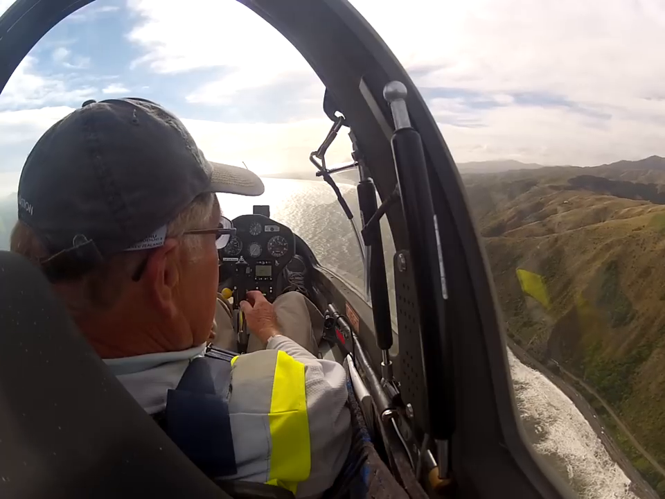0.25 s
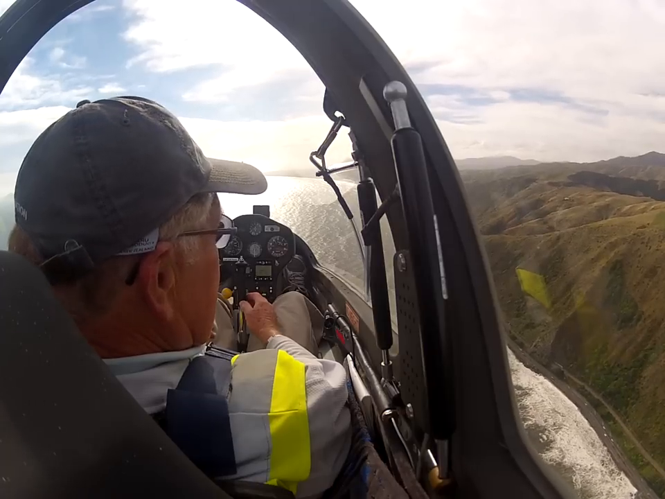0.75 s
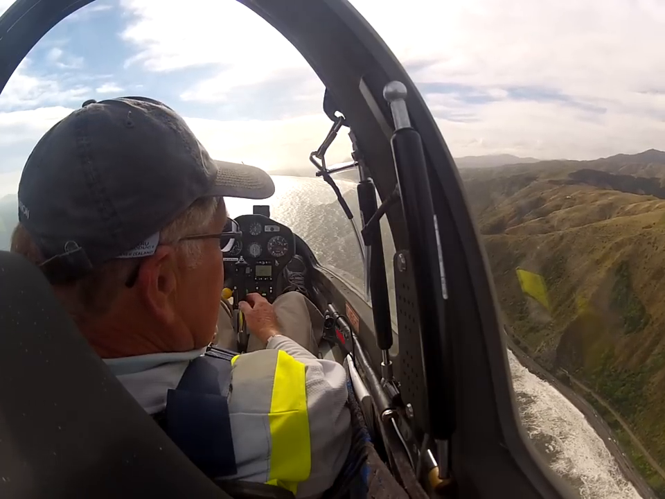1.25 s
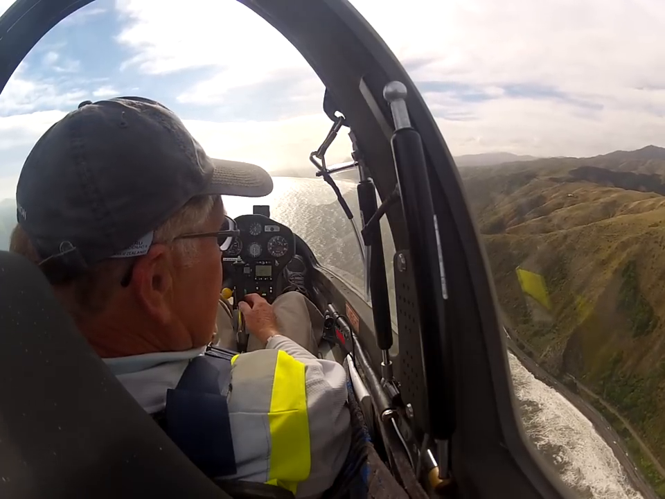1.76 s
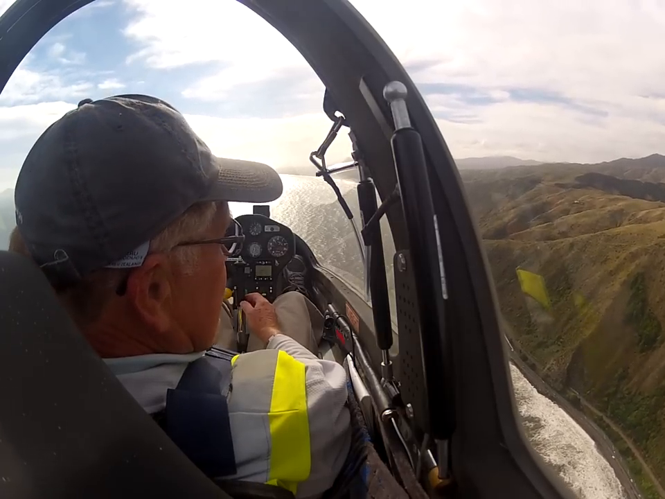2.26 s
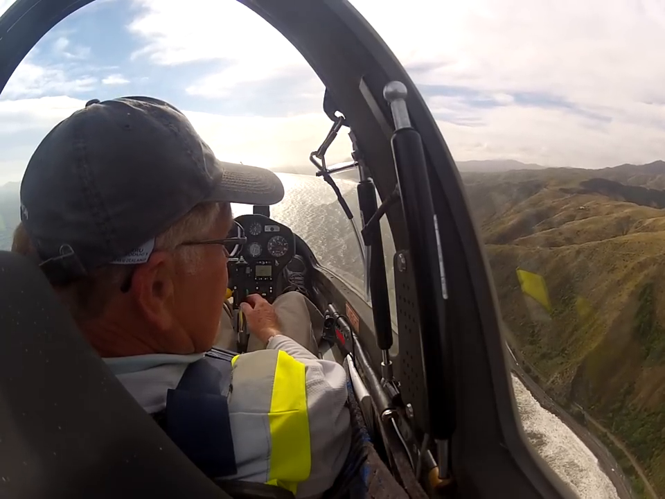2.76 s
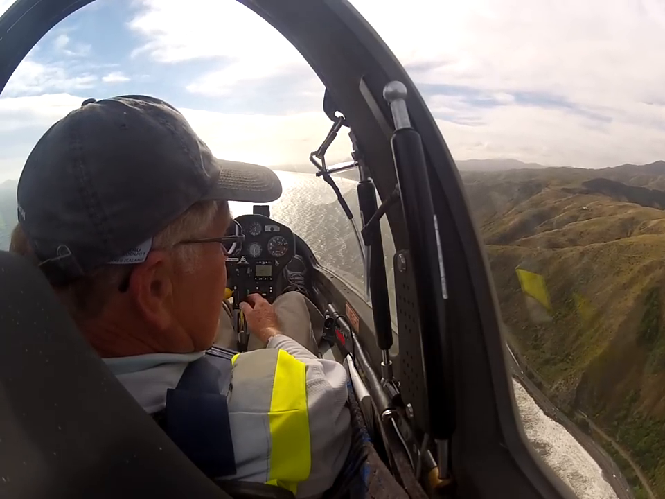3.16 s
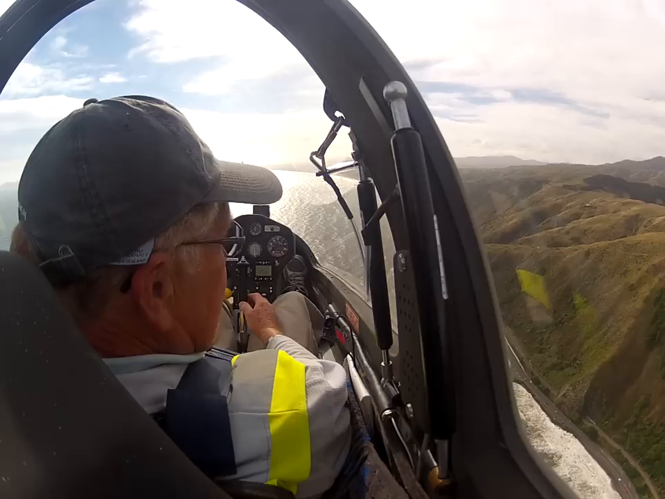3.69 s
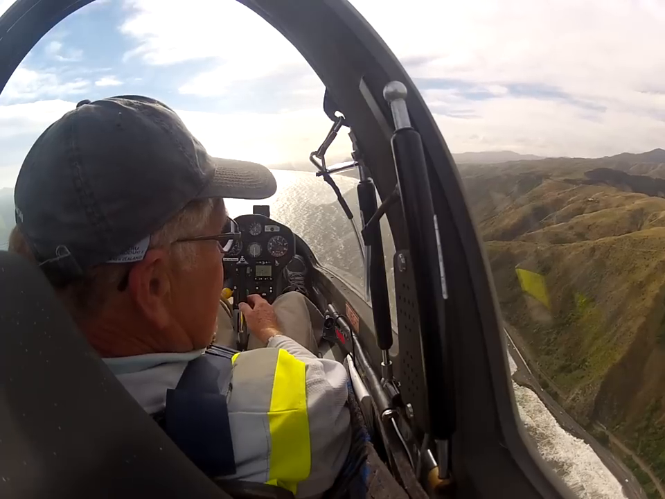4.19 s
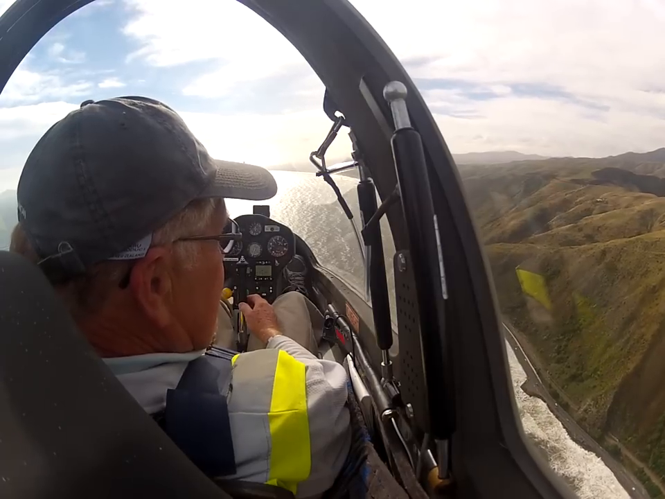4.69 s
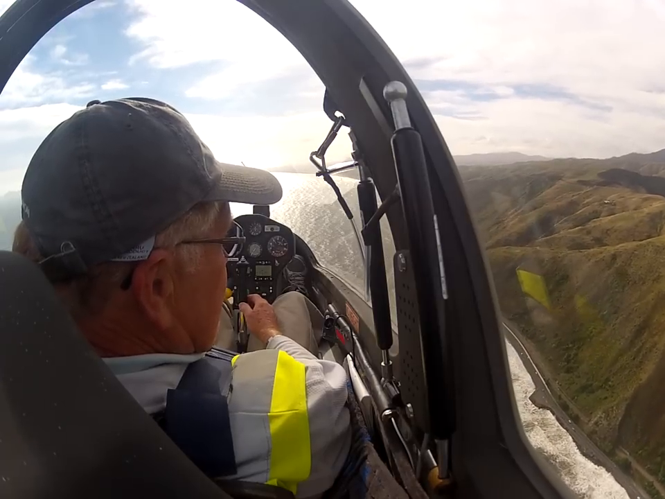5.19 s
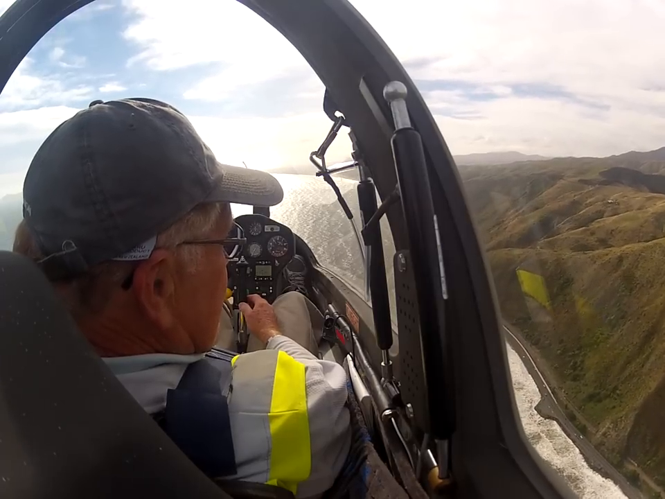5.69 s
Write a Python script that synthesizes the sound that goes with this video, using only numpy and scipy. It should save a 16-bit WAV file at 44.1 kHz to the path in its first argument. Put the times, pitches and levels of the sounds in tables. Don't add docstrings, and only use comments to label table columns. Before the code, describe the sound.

From 0 to about 6 seconds, with no fade or pause, loud airflow surrounds a glider cockpit in flight. The sound is mostly deep: a boomy rumble around 70 to 200 hertz, broken into quick, irregular thumps and flutters as eddies strike the canopy. Strong blows cluster in the first 0.7 seconds, then buffets keep swelling and easing unpredictably, with firm hits near 2.0, 3.2 and 3.9 seconds, a broader swell around 4.7, and heavy booming from 5.6 to the end. A hollow low drone and duller panel resonance of the shell fill the gaps. Far quieter, a steady, slightly whistly hiss of air through seals and vent flickers lightly. The small microphone is close, inside the cabin; its level squeezes and clips on peaks, adding crackly roughness and a faint brittle treble. No engine, voice or control clicks.

```python
import sys
import numpy as np
from scipy import signal
from scipy.fft import rfft, irfft
from scipy.io import wavfile
from scipy.ndimage import uniform_filter1d

SR = 44100
rng = np.random.default_rng(int(sys.argv[2]) if len(sys.argv) > 2 else 0)


def field_ratio(decibels):
    return 10 ** (np.asarray(decibels, dtype=float) / 20)


def int16_out(signal):
    q = np.round(np.clip(np.atleast_2d(signal).T, -1, 1) * 32767)
    wavfile.write(sys.argv[1], SR, q.astype(np.int16))


N = 261954


def walk(rate):
    hold = int(SR / rate)
    steps = np.repeat(rng.standard_normal(N // hold + 1), hold)
    return 1.37 * uniform_filter1d(uniform_filter1d(steps, hold), hold)[:N]


def unit(x):
    return x / np.sqrt(np.mean(x ** 2))


def coloured(points):
    hz, db = np.transpose(points)
    f = np.arange(N // 2 + 1) * SR / N + 1e-3
    gain = field_ratio(np.interp(np.log(f), np.log(hz), db, left=-90, right=-90))
    return unit(irfft(rfft(rng.standard_normal(N)) * gain, N))


def rung(modes):
    f = np.arange(N // 2 + 1) * SR / N
    spectrum = 0
    for hz, width, db in modes:
        resonance = 1 / (1 + 1j * (f - hz) / width) ** 2
        spectrum = spectrum + field_ratio(db) * resonance * rfft(rng.standard_normal(N))
    return unit(irfft(spectrum, N))


def buffet(surges, lull_db, flutter_db, flutters_per_s):
    t = np.arange(N) / SR
    power = field_ratio(lull_db + flutter_db * walk(flutters_per_s)) ** 2
    for centre, peak_db, length in surges:
        bell = np.exp(-((t - centre) / (0.51 * length)) ** 2)
        power = power + bell * (field_ratio(peak_db) ** 2 - power)
    return 10 * np.log10(power)


def driven(modes, drive_db, steady_s):
    ringing = rung(modes)
    span = int(steady_s * SR)
    chance_power = uniform_filter1d(uniform_filter1d(ringing ** 2, span), span)
    return field_ratio(drive_db) * unit(ringing / np.sqrt(chance_power))


def rumble():
    # frequency in Hz, density in dB per Hz.
    colour = [(12, -14), (20, 7), (30, -1), (42, 5.5), (55, -12), (220, 4), (500, -8), (1000, -21),
              (1400, -48)]
    return field_ratio(-26) * coloured(colour)


def hiss(shell_drive_db):
    # frequency in Hz, density in dB per Hz.
    colour = [(530, -38), (900, -25.5), (990, -23), (1070, -6.5), (1370, -11.5), (1660, -12), (1910, -9),
              (2590, -6.5), (2820, -3), (2980, -1), (4200, -9), (4960, -7), (6000, -18.5), (7800, -54),
              (13200, -120)]
    # frequency in Hz, width in Hz, level in dB.
    canopy_modes = [(1060, 67, -11), (1260, 55, -7), (1990, 36, -0.5), (2220, 150, -4), (2740, 110, 0),
                    (2885, 90, 1.5), (3018, 110, -2), (4800, 120, -17), (4940, 71, -3)]
    canopy_db, flicker_db, level_db = -11, 0.5, -33.5
    rush = coloured(colour) + field_ratio(canopy_db) * rung(canopy_modes)
    flickering = unit(rush * field_ratio(flicker_db * walk(25.04)))
    swell_db = 0.082 * (shell_drive_db - shell_drive_db.mean())
    return field_ratio(level_db + swell_db) * flickering


def shell_drive():
    # centre in seconds, peak level in dB, length in seconds.
    surges = [(0.14, -17, 0.057), (0.27, -15.5, 0.063), (0.43, -17, 0.024), (0.55, -17, 0.074),
              (0.72, -17, 0.12), (1.56, -16.6, 0.11), (1.68, -18, 0.11), (2.03, -18, 0.09),
              (2.49, -18, 0.04), (2.57, -17, 0.15), (3.13, -16.5, 0.055), (3.31, -17.5, 0.056),
              (3.9, -16, 0.04), (4.19, -18, 0.055)]
    return buffet(surges, lull_db=-19.5, flutter_db=0.54, flutters_per_s=4)


def shell(drive_db):
    # frequency in Hz, width in Hz, level in dB.
    modes = [(259.7, 12.3, 0), (298.4, 17.5, 0.5), (326, 15.5, 1), (377, 39, -5), (430, 41, -6),
             (460, 19.5, -15), (538.4, 35.2, -6), (601.5, 45, -18), (707, 109, -18), (840, 99, -24)]
    return driven(modes, drive_db, steady_s=0.086)


def drone():
    # frequency in Hz, width in Hz, level in dB.
    modes = [(150, 12, -5), (168, 8, 0), (195, 14, -17)]
    # centre in seconds, peak level in dB, length in seconds.
    surges = [(0.06, -15, 0.08), (0.17, -14.1, 0.03), (0.24, -15.5, 0.086), (0.4, -10.0, 0.059),
              (0.59, -13, 0.16), (0.89, -10.5, 0.076), (1.28, -14, 0.09), (1.35, -14, 0.17),
              (1.55, -11.5, 0.058), (1.71, -11, 0.14), (1.82, -14, 0.13), (2.13, -13.5, 0.08),
              (2.37, -13.5, 0.17), (2.64, -14.6, 0.05), (2.76, -11.5, 0.091), (3.06, -13.6, 0.043),
              (3.23, -17.5, 0.098), (3.34, -15, 0.05), (3.65, -16.5, 0.067), (3.91, -18, 0.05),
              (4.02, -14, 0.34), (4.32, -14, 0.025), (4.4, -12.5, 0.03), (4.52, -11.5, 0.1),
              (4.66, -14, 0.11), (4.82, -12.5, 0.04), (5.08, -14.5, 0.16), (5.23, -14, 0.052),
              (5.32, -12.5, 0.069), (5.59, -8.5, 0.1)]
    drive_db = buffet(surges, lull_db=-18, flutter_db=3.6, flutters_per_s=18)
    return driven(modes, drive_db, steady_s=0.047)


def heave():
    # frequency in Hz, width in Hz, level in dB.
    modes = [(73, 9, 0)]
    # centre in seconds, peak level in dB, length in seconds.
    surges = [(0.04, -19, 0.036), (0.22, -12, 0.15), (0.32, -25, 0.04), (0.45, -12, 0.11), (0.7, -14, 0.08),
              (1.0, -13, 0.24), (1.43, -16, 0.16), (1.59, -17.5, 0.14), (1.84, -16.5, 0.15),
              (1.98, -22, 0.05), (2.06, -13, 0.065), (2.17, -19, 0.077), (2.32, -17, 0.08),
              (2.56, -14, 0.13), (2.71, -17.7, 0.05), (2.79, -15, 0.06), (2.98, -15.1, 0.18),
              (3.24, -13.5, 0.13), (3.58, -16, 0.15), (3.8, -17, 0.07), (3.94, -25, 0.1),
              (4.14, -22, 0.082), (4.42, -20, 0.12), (4.69, -15, 0.17), (5.02, -15, 0.05), (5.13, -14, 0.1),
              (5.25, -12.5, 0.08), (5.34, -15, 0.04), (5.52, -19, 0.15), (5.77, -12.5, 0.072)]
    drive_db = buffet(surges, lull_db=-21.5, flutter_db=3.7, flutters_per_s=26)
    return driven(modes, drive_db, steady_s=0.043)


def boom():
    # frequency in Hz, width in Hz, level in dB.
    modes = [(88, 8, -7), (97, 9, 0), (112, 12, -7)]
    # centre in seconds, peak level in dB, length in seconds.
    surges = [(0.04, -7.5, 0.04), (0.28, -7.5, 0.09), (0.37, -7, 0.055), (0.59, -7.5, 0.042),
              (0.95, -11.5, 0.05), (1.07, -8.5, 0.039), (1.25, -7.5, 0.06), (1.5, -9, 0.16),
              (1.59, -10.5, 0.15), (1.98, -7, 0.04), (2.1, -10, 0.18), (2.16, -8.6, 0.04),
              (2.26, -10.5, 0.05), (2.63, -9.5, 0.13), (3.0, -10.5, 0.046), (3.2, -7, 0.053),
              (3.44, -9.5, 0.16), (3.68, -8, 0.069), (3.86, -7, 0.046), (3.96, -6.5, 0.041),
              (4.04, -10.2, 0.04), (4.22, -9, 0.098), (4.67, -6, 0.17), (4.76, -8.5, 0.055),
              (4.86, -9.5, 0.053), (5.05, -7.5, 0.043), (5.16, -9, 0.061), (5.63, -7, 0.091),
              (5.7, -6, 0.04), (5.85, -6, 0.06)]
    drive_db = buffet(surges, lull_db=-15, flutter_db=2, flutters_per_s=18)
    return driven(modes, drive_db, steady_s=0.046)


def scene():
    shell_drive_db = shell_drive()
    cockpit = heave() + boom() + drone() + shell(shell_drive_db)
    low_cut = signal.butter(6, 63, "high", fs=SR, output="sos")
    cockpit = signal.sosfilt(low_cut, cockpit)
    return (cockpit + hiss(shell_drive_db) + rumble())[None]


def gain_control(x):
    threshold_db, ratio, window_s = -6.5, 1.45, 0.022
    excess = np.sqrt(uniform_filter1d(x ** 2, int(window_s * SR))) / field_ratio(threshold_db)
    return x * np.maximum(excess, 1) ** (1 / ratio - 1)


def slow_converter(x):
    held_hz, full_scale = 12000, 1.024
    slow = signal.resample_poly(x, held_hz // 300, SR // 300, axis=1)
    held = np.repeat(np.clip(slow, -full_scale, full_scale), 4, axis=1)
    out = signal.resample_poly(held, SR // 300, 4 * held_hz // 300, axis=1)[:, :N]
    top_cut = signal.ellip(10, 0.2, 70, 15300, fs=SR, output="sos")
    return signal.sosfilt(top_cut, out)


def band_limit(x):
    return signal.sosfilt(signal.butter(12, 16660, fs=SR, output="sos"), x)


def record(dry):
    mix = slow_converter(gain_control(dry))
    return band_limit(mix)


dry = scene()
out = record(dry)
int16_out(out)
```